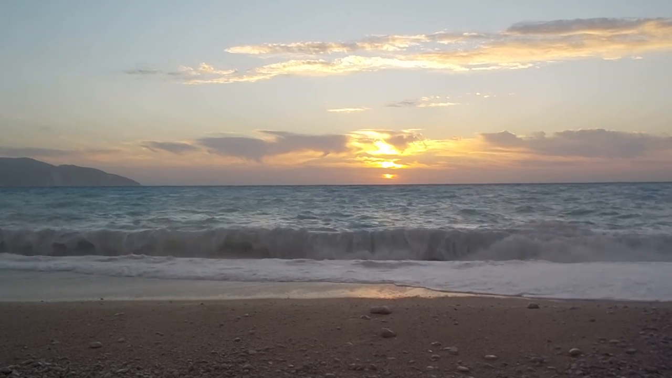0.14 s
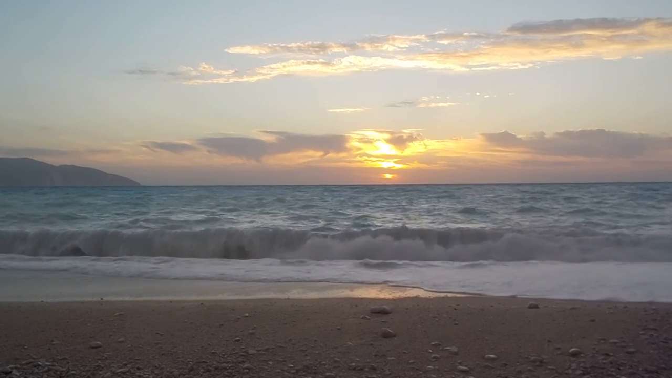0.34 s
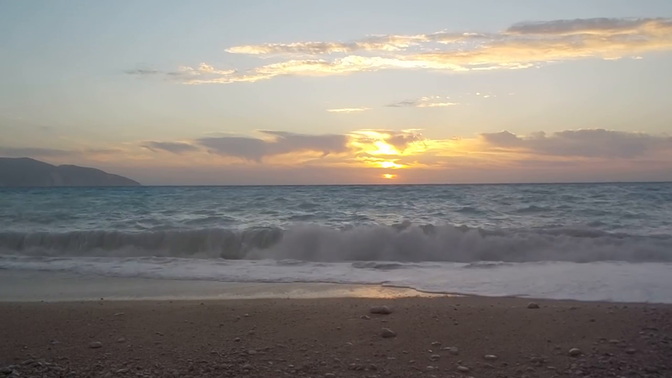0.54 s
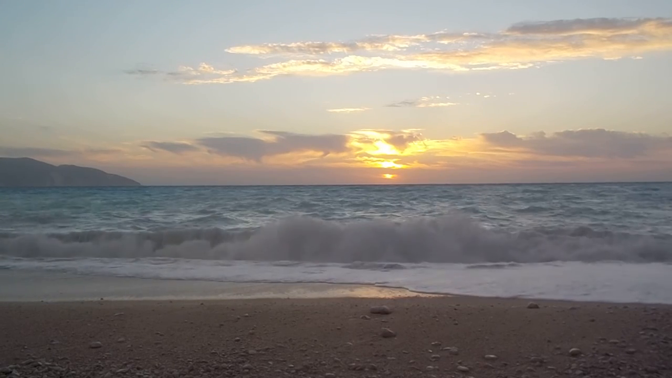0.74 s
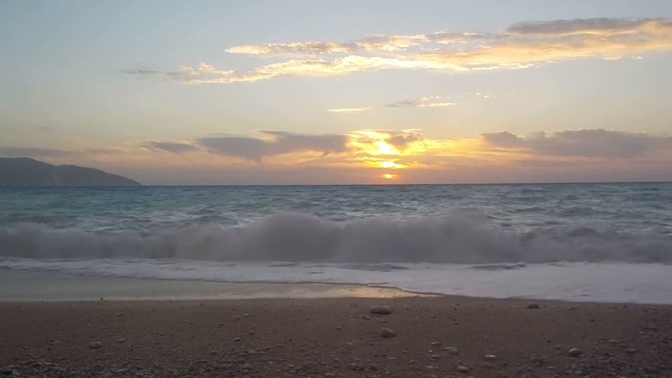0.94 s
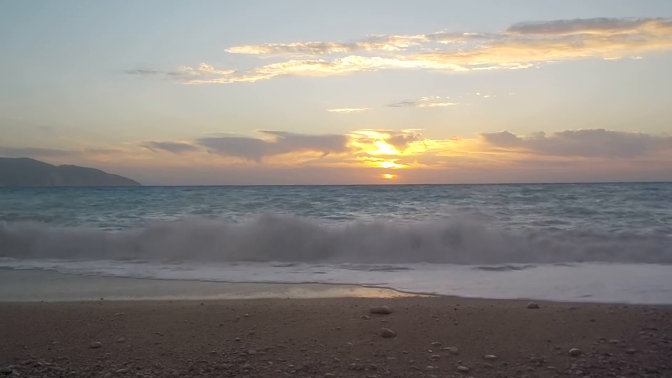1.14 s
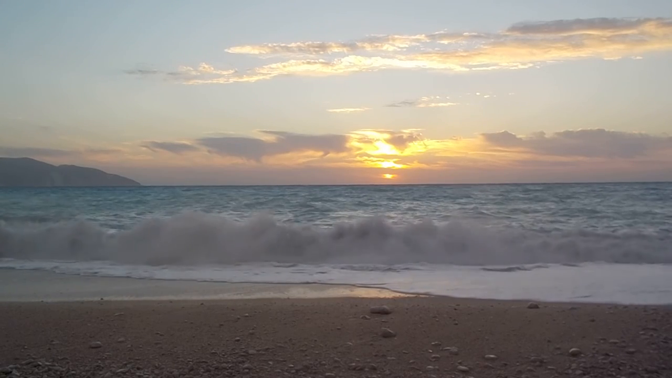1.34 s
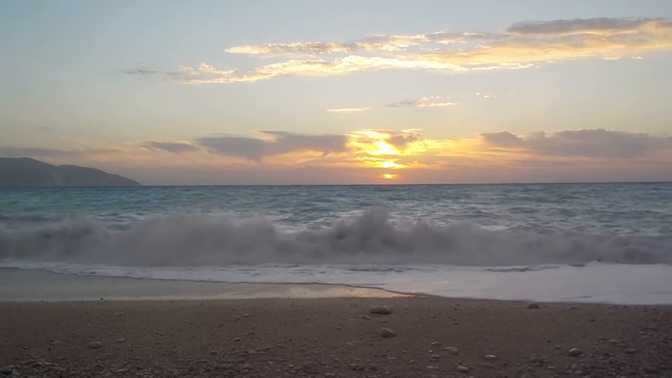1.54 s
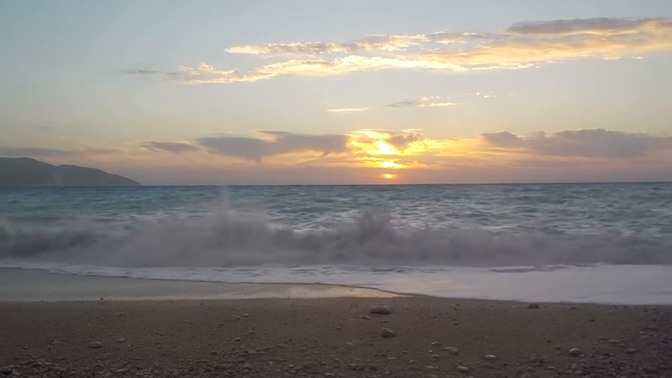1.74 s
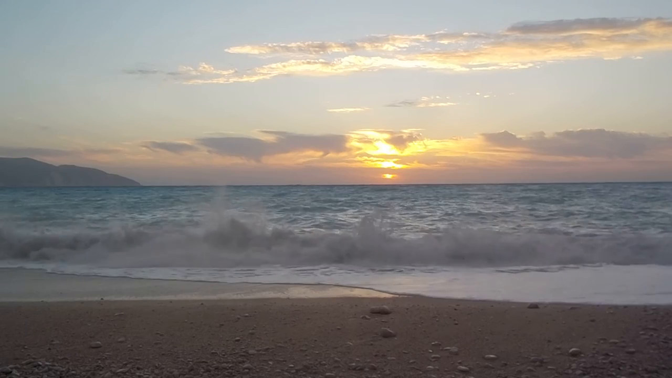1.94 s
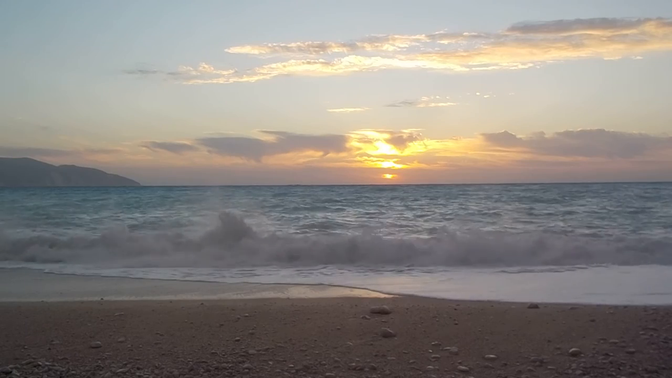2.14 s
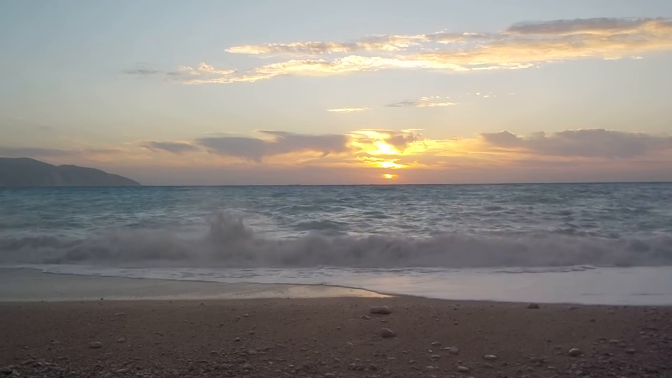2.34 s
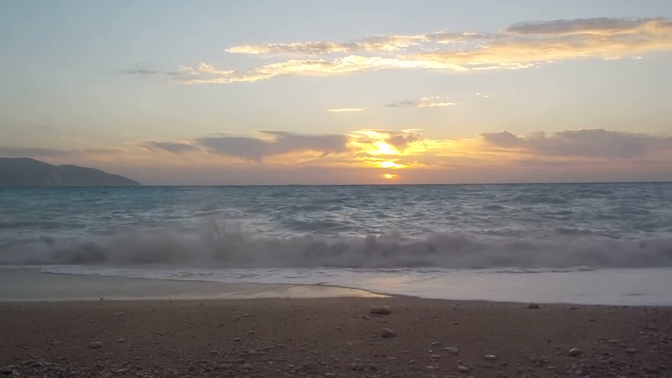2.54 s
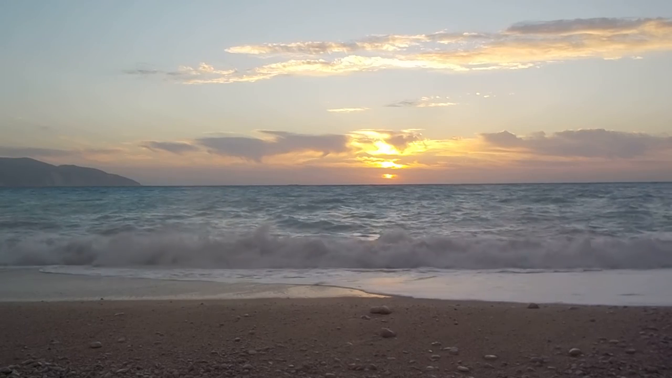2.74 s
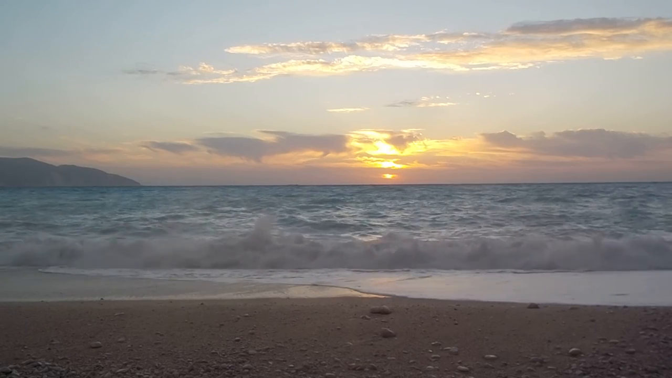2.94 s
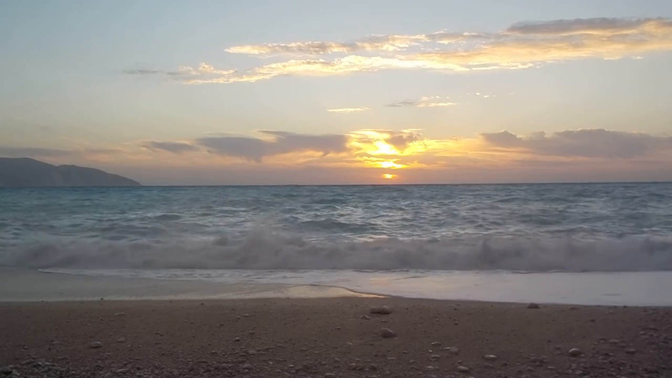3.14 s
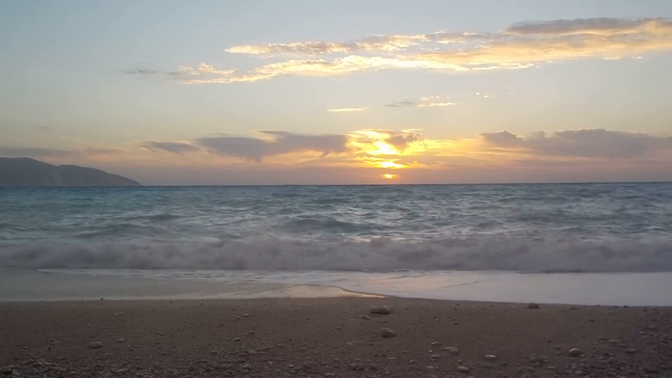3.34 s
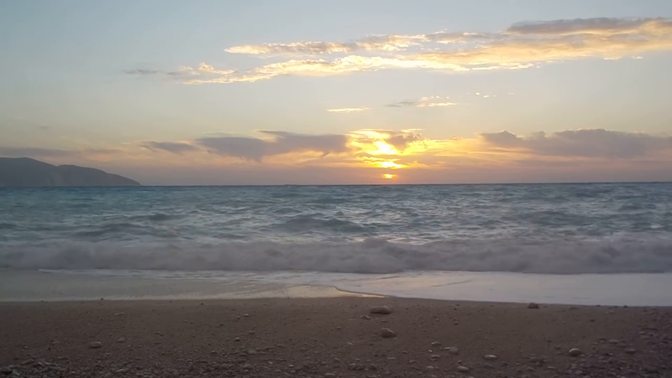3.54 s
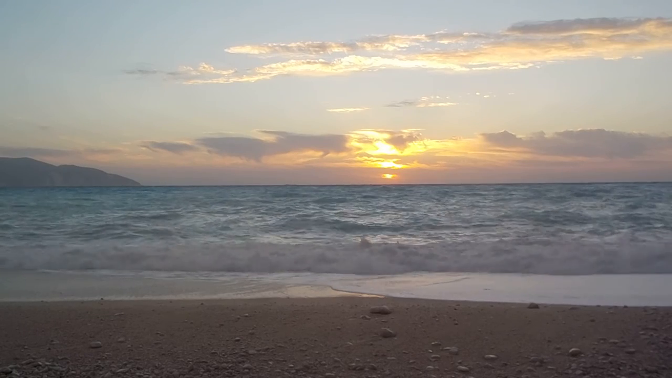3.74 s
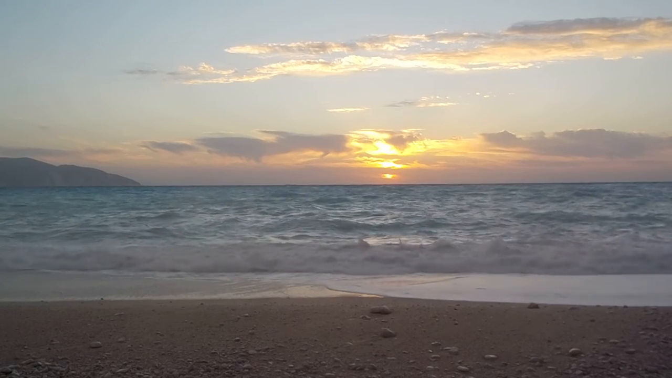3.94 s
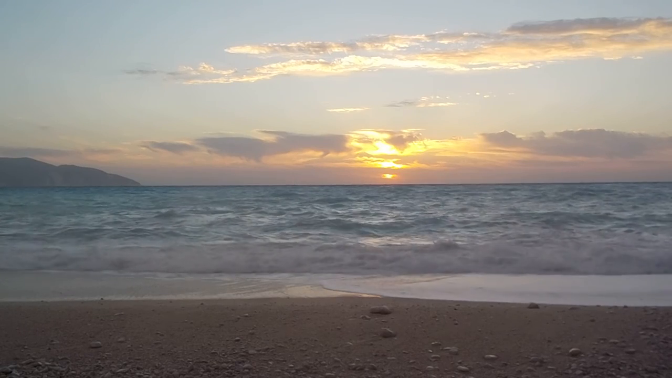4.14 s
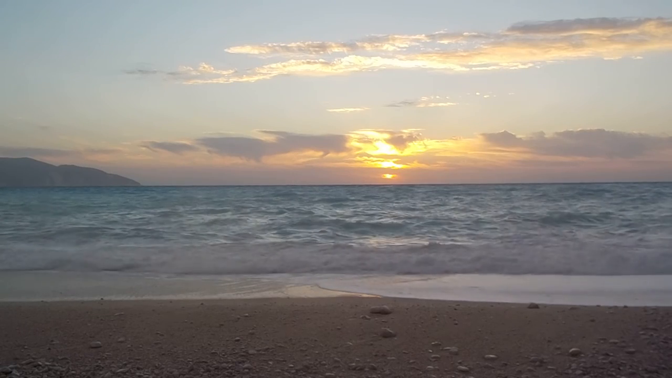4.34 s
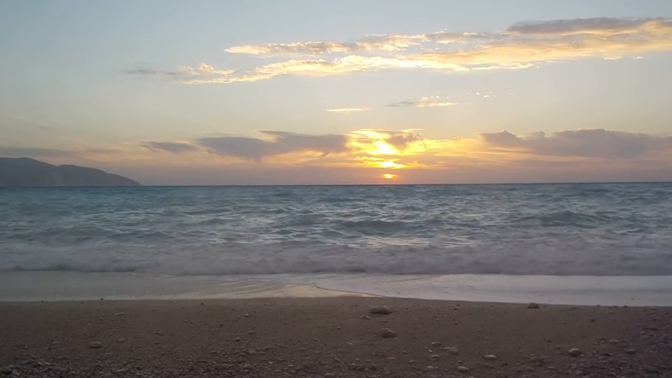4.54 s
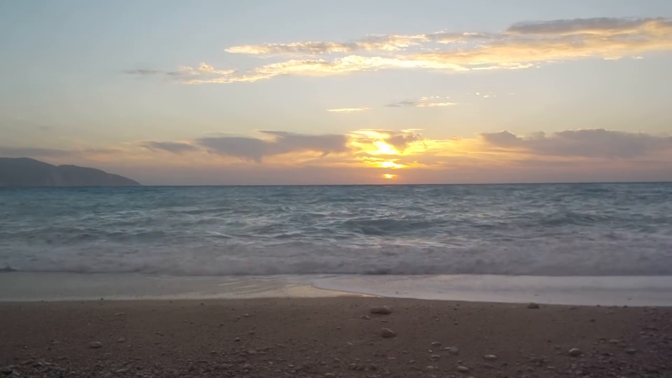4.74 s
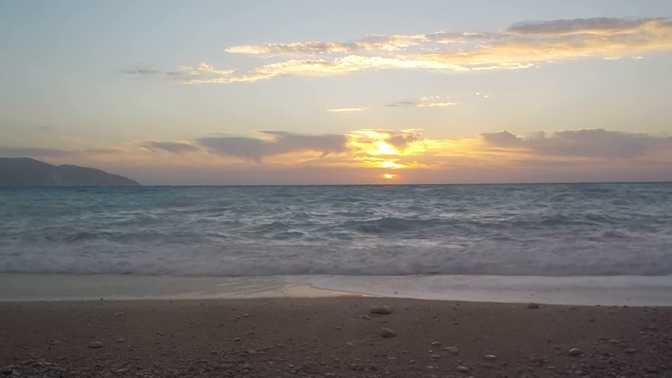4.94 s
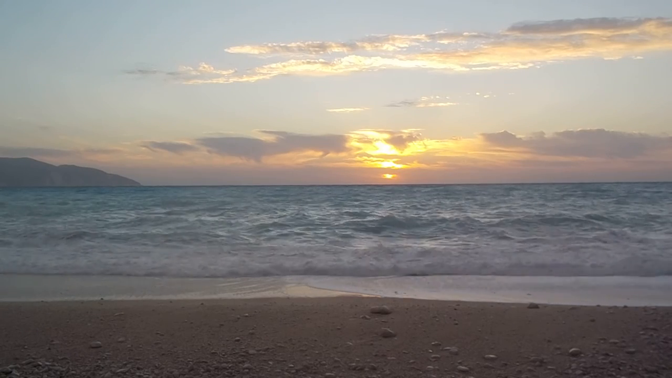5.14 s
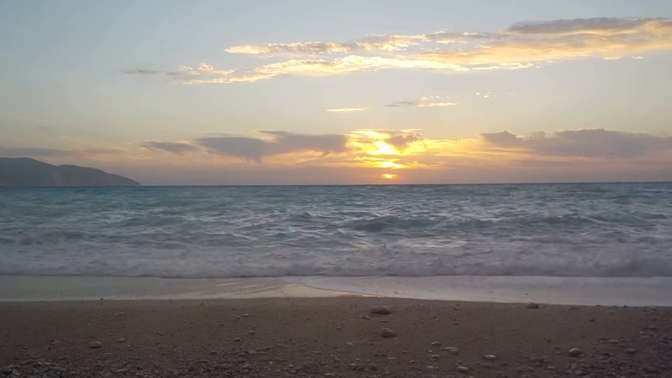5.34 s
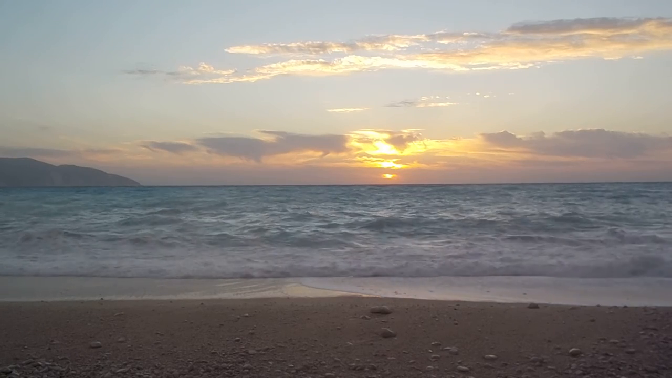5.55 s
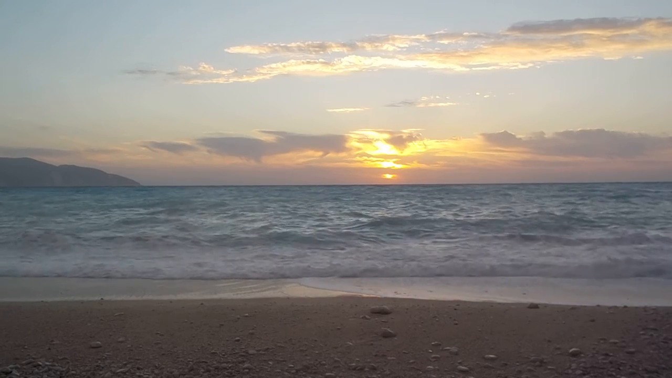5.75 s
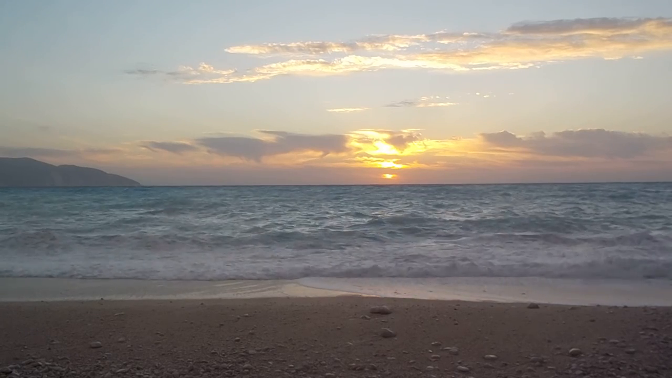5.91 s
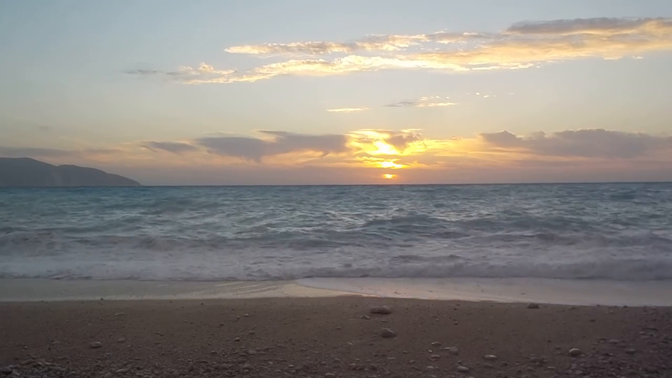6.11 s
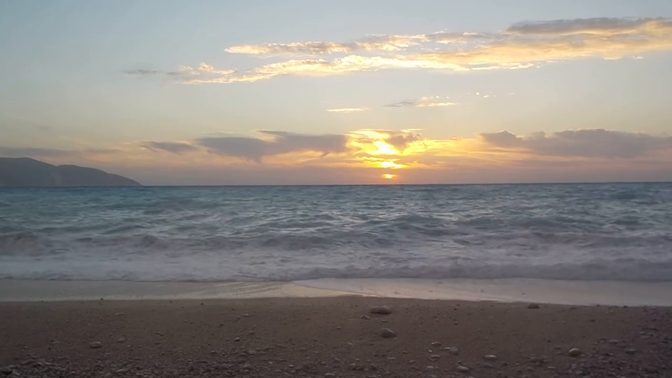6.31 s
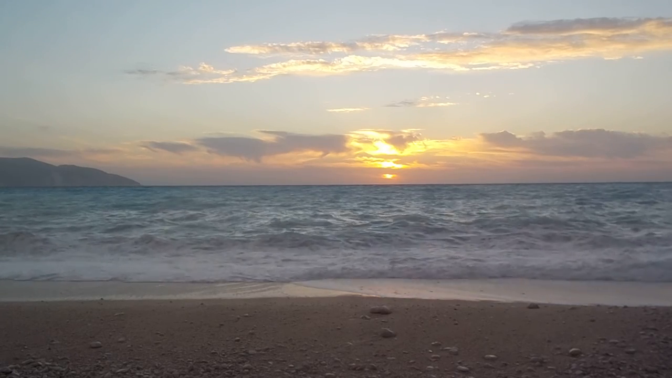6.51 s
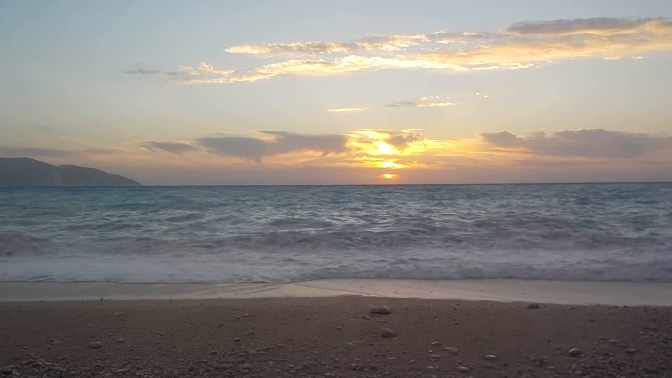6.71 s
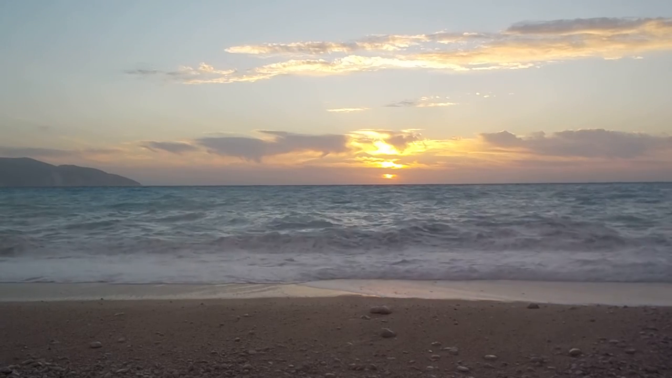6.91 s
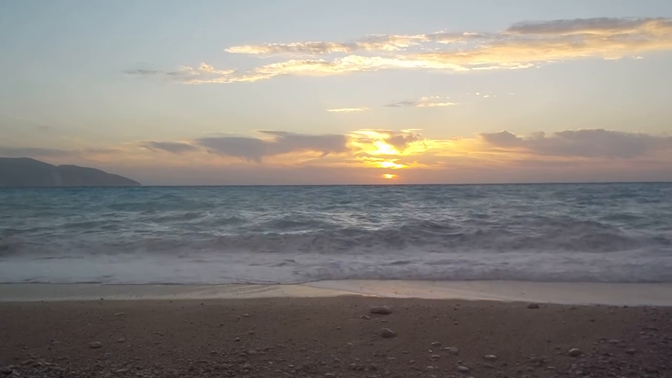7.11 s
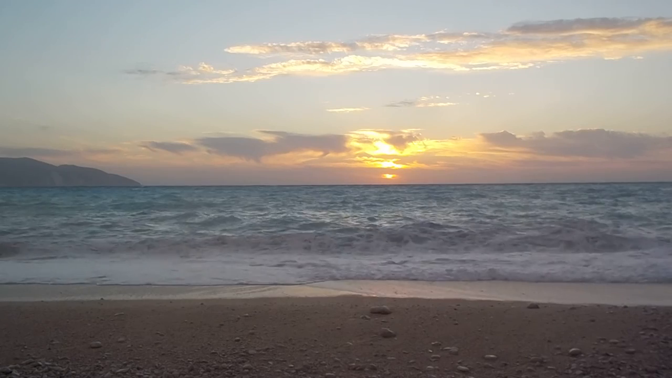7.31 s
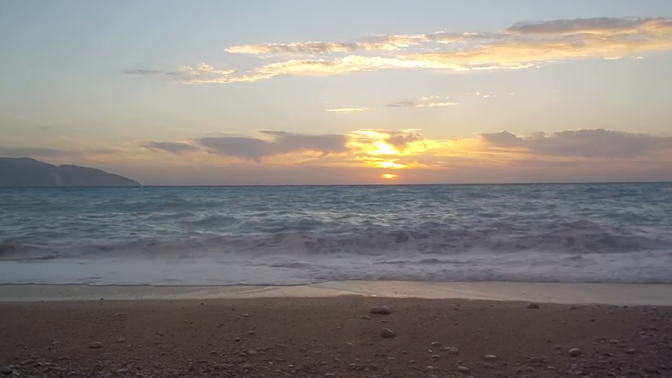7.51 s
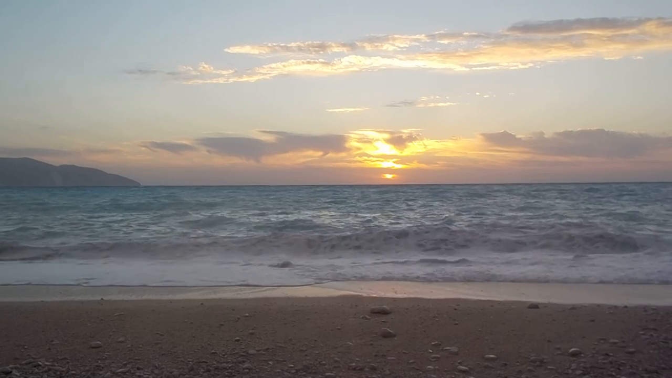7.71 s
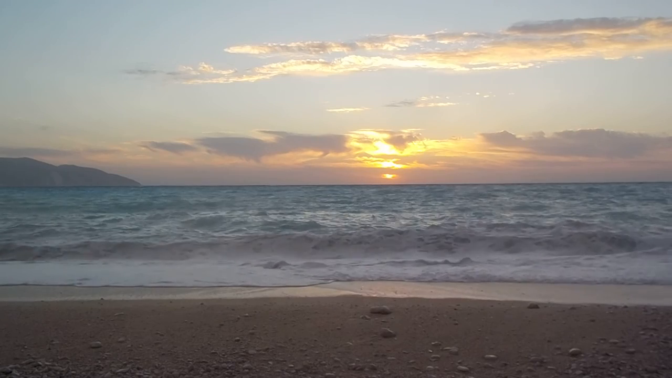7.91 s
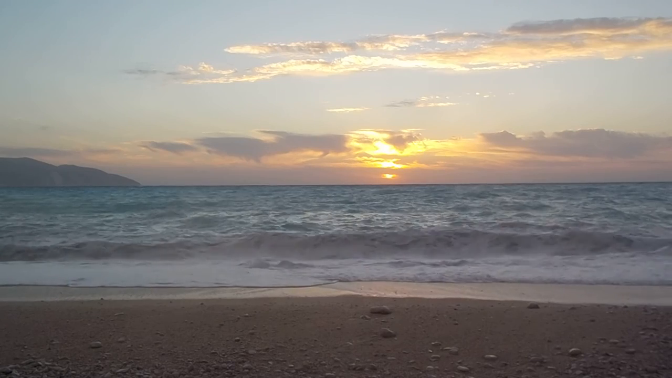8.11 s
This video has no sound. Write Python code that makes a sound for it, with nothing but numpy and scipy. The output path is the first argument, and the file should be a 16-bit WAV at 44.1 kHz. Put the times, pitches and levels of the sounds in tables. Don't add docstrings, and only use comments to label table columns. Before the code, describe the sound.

Close, lumpy wind buffeting batters a small stereo microphone for the first second and a half, nearly covering a wave running in. The wave breaks around two seconds with a broad roar, then sinks into watery hiss over pebbles. Softer gusts flutter between about three and a half and five seconds. Then the wind drops, leaving quiet wash and faint electronic hiss on an open beach.

```python
import sys
import numpy as np
from scipy import signal
from scipy.fft import rfft, irfft
from scipy.io import wavfile

SR = 44100
rng = np.random.default_rng(int(sys.argv[2]) if len(sys.argv) > 2 else 0)


def unload_wav(signal):
    wavfile.write(
        sys.argv[1],
        SR,
        np.round(np.clip(np.atleast_2d(signal).T, -1, 1) * 32767).astype(np.int16),
    )


def boost_factor(decibels):
    exponent = np.asarray(decibels, float) / 20
    return 10 ** exponent


N = 364707


def rms_one(x):
    return x / np.sqrt(np.mean(x ** 2) + 1e-20)


def in_time(rows):
    s, *columns = np.transpose(rows)
    return [np.interp(np.arange(N) / SR, s, column) for column in columns]


def at_hz(points, hz):
    points = np.array(points)
    return np.interp(np.log(hz), np.log(points[:, 0]), points[:, 1])


def drift(rate_hz):
    step, run_in = 20, 4000
    pole = np.exp(-2 * np.pi * rate_hz * step / SR)
    noise = rng.standard_normal(N // step + run_in + 2)
    slow = signal.lfilter([1], [1, -2 * pole, pole * pole], noise)[run_in:]
    return np.interp(np.arange(N) / step, np.arange(len(slow)), rms_one(slow))


def filtered(x, order, hz, kind):
    return signal.sosfilt(signal.butter(order, hz, kind, fs=SR, output="sos"), x)


# frequency in Hz, gain in dB.
LEFT_PORT = [(60, -36.5), (130, -22), (250, -9.5), (450, -3), (1110, -1.5), (1320, -10.5), (1550, -9),
             (2050, -4), (3150, 0), (3700, -5.5), (4600, -12), (5600, -15), (6600, -18), (9500, -29)]
# frequency in Hz, gain in dB against the left port.
RIGHT_PORT = [(300, 2.3), (600, 2.8), (820, 5.7), (1080, -8.5), (1250, -0.0), (1450, -1.4), (1900, 1.6),
              (2250, -11.8), (2400, -11.8), (3200, -12.9), (3900, -5.7), (4300, -6.1), (5000, -2.2),
              (6000, -6.6)]


def ports(x):
    size = 8192
    hz = np.maximum(np.arange(size // 2 + 1) * SR / size, 1)
    left = at_hz(LEFT_PORT, hz)
    left -= 30 * np.log2(np.maximum(hz / LEFT_PORT[-1][0], 1))
    left -= 8.7 * np.log2(np.maximum(LEFT_PORT[0][0] / np.maximum(hz, 15), 1))
    right = left + at_hz(RIGHT_PORT, hz)
    cepstrum = irfft(np.log(boost_factor(np.array([left, right]))))
    cepstrum[:, 1:size // 2] *= 2
    cepstrum[:, size // 2 + 1:] = 0
    impulse = irfft(np.exp(rfft(cepstrum)))
    return signal.fftconvolve(x, impulse, axes=1)[:, :N]


# frequency in Hz, level in dB rms.
WHINE = [(15569, -90), (15628, -88), (15687, -88)]


def electronics():
    hiss_db = -63
    common, left, right = rng.standard_normal((3, N))
    hiss = boost_factor(hiss_db) * (0.47 * common + np.array([left, boost_factor(0.5) * right]))
    out = filtered(hiss, 1, 40, "high")
    for hz, level_db in WHINE:
        out = out + np.sqrt(2) * boost_factor(level_db) * np.sin(2 * np.pi * hz * np.arange(N) / SR)
    return out


# time in seconds, level in dB.
SWELL = [(0.0, -45), (1.5, -44), (3.6, -45.5), (4.6, -52.5), (5.0, -51.5), (5.9, -56.5), (6.4, -49),
         (7.2, -51), (8.27, -49.5)]
# time in seconds, breaker roar in dB, foam fizz in dB.
SURF = [(0.0, -39.5, -39.5), (0.5, -36.5, -37), (1.05, -37, -38), (1.45, -34.5, -34), (1.91, -30.5, -37),
        (2.3, -32, -39.5), (2.95, -32, -41), (3.64, -33, -45), (4.24, -35, -47), (4.63, -37, -49.5),
        (4.9, -37.5, -47.5), (5.96, -39, -48.5), (6.52, -41, -44.5), (6.79, -42, -47.5), (7.16, -43, -48),
        (7.51, -44, -45), (7.85, -43, -41.5), (8.27, -42, -44.5)]
# time in seconds, level in dB.
BACKWASH = [(0.0, -44.5), (1.5, -43), (3.3, -43.5), (3.64, -42), (4.9, -43.5), (5.96, -50), (6.52, -47),
            (7.16, -50.5), (8.27, -49.5)]
SURF_HZ = [280, 800, 1900, 4000, 9500]
SURF_LIFT_DB = [23.8, 19.3, 26.1, 22]
# frequency in Hz, level in dB against the front.
DIFFUSE = [(300, -40), (1500, -7), (4000, -8.5), (6000, -14), (10000, -3.5)]


def surf():
    fizz_share = 0.63
    breaker, foam = in_time(SURF)
    layers = np.array([in_time(SWELL)[0], breaker, in_time(BACKWASH)[0], foam])
    body, roar, wash, fizz = layers + np.array(SURF_LIFT_DB)[:, None]
    spray = fizz_share * fizz + (1 - fizz_share) * roar
    strength = np.array([body, roar, wash, fizz, spray])
    surge = drift(2)
    edges = 40 * 2 ** np.arange(0, 9, .5)
    white = rng.standard_normal((2, 2, N))
    out = 0
    for k, (low, high) in enumerate(zip(edges, edges[1:])):
        hz = np.sqrt(low * high)
        share = [np.interp(np.log(hz), np.log(SURF_HZ), row) for row in np.eye(5)]
        front, around = filtered(white[k % 2], 2, [low, high], "band")
        gain = boost_factor(share @ strength + 0.04 * surge + 0.65 * drift(7.1))
        sides = boost_factor(at_hz(DIFFUSE, hz)) * around * [[1], [-1]]
        out = out + gain * (front + sides)
    return ports(out)


# start in seconds, length in seconds, from Hz, to Hz, level in dB.
WHISTLES = [
    (0.445, 0.016, 1270, 1380, -27),
    (0.537, 0.042, 1310, 1250, -27.5),
]


def whistles():
    out = np.zeros(N)
    for s, length, from_hz, to_hz, level_db in WHISTLES:
        glide = np.linspace(from_hz, to_hz, round(length * SR))
        count = len(glide)
        flutter = boost_factor(rng.normal(0, 2.2, 5).repeat(count // 5 + 1)[:count])
        tone = np.sin(2 * np.pi * np.cumsum(glide) / SR)
        i = round(s * SR)
        out[i:i + count] += boost_factor(level_db) * np.hanning(count) ** .5 * flutter * tone
    return out


# time in seconds, level in dB, left minus right in dB.
BREEZE = [(0.0, -42, -1), (1.4, -44.5, -1), (2.0, -49, 0), (2.8, -48.5, -4), (3.45, -49, -4),
          (3.5, -36, -2), (3.56, -48, -6), (3.7, -44, -2), (3.75, -32.5, -2), (4.2, -34, 9.5),
          (4.66, -37.5, -1), (4.7, -55, -4), (5.06, -63, -4), (5.085, -42, -7), (5.22, -43, 0),
          (5.4, -56, 4), (6.0, -74, 3), (6.3, -62, 2)]
# start in seconds, length in seconds, usual eddy in dB on the left port, on the right port.
GUSTS = [(0.0, 0.045, -12, -16), (.128, .025, -21, -21), (.165, .028, -14.5, -17), (.26, 0.047, -29, -26.5),
         (.388, 0.025, -13.5, -19.5), (.487, 0.025, -11.5, -11), (.535, 0.039, -22, -33),
         (.59, .035, -11.5, -14.5), (.632, .065, -14.5, -17.5), (0.709, .033, -12, -11.5),
         (0.757, .043, -13, -13), (0.797, .08, -12.5, -13), (.893, .034, -13.5, -12), (.945, .02, -19, -23),
         (1.065, 0.049, -10, -16.5), (1.122, 0.046, -18, -14), (1.28, .046, -13.5, -12.5),
         (1.332, 0.018, -18, -12.5), (1.675, 0.023, -26, -31), (1.935, 0.025, -14, -21),
         (3.06, 0.0615, -32, -28), (3.733, 0.044, -16.5, -22.5), (3.81, 0.051, -22.5, -21.5),
         (4.049, .045, -19.5, -27), (4.305, 0.041, -17, -31), (4.36, 0.056, -16.5, -22.5),
         (4.435, 0.053, -26, -22), (4.598, 0.063, -23, -28.5), (5.112, .02, -25.5, -21.5),
         (5.155, 0.054, -28, -22.5)]


def wind():
    push_db, edge_s = -12.5, 0.0093
    level_db, pan_db = in_time(BREEZE)
    push = boost_factor(level_db + pan_db * np.array([[.5], [-.5]]))
    for s, length, *sides_db in GUSTS:
        i = np.arange(max(round((s - edge_s) * SR), 0), round((s + length + edge_s) * SR))
        inside_s = np.minimum(i / SR - s, s + length - i / SR)
        shape = np.clip(inside_s / edge_s + .5, 0, 1)
        gust = boost_factor(np.array(sides_db)[:, None] + push_db) * shape ** 2
        push[:, i] = np.maximum(push[:, i], gust)
    lumps = [boost_factor(3.2 * drift(58) + 1.5 * drift(6.6)) * rng.standard_normal(N) for side in range(2)]
    dull = filtered(np.array(lumps), 2, 330, "low")
    return rms_one(ports(dull)) * push


def shed(side):
    gap_s, spread_db, usual_hz, spread_octaves = .007, 0.5, 608, 0.43
    octaves_per_db, firm_db = 0.0734, -13.5
    rows = []
    for gust, (gap, size, pitch) in zip(GUSTS, rng.standard_normal((len(GUSTS), 3, 24))):
        start, length, level_db = gust[0], gust[1], gust[2 + side]
        s = np.cumsum(gap_s * 2 ** (.5 * gap)) - gap_s / 2
        octaves = spread_octaves * pitch + octaves_per_db * (level_db - firm_db)
        shed_rows = np.transpose([start + s, level_db + spread_db * size, usual_hz * 2 ** octaves])
        rows += list(shed_rows[s < length])
    return rows


def eddies(rows, port_db, lift_db):
    cycles, lead_s = .43, .0006
    skirt_db, skirt_s = -15, .005
    out, flurry = np.zeros((2, N + 2000))
    t = np.arange(-1000, 1000) / SR
    for (s, peak_db, hz), turn in zip(rows, rng.random((len(rows), 1))):
        i = round((s - lead_s) * SR)
        keep = slice(max(1000 - i, 0), None)
        at = slice(max(i - 1000, 0), i + 1000)
        packet = np.exp(-.5 * (t * hz / cycles) ** 2) * np.cos(2 * np.pi * (hz * t + turn))
        strength = boost_factor(peak_db + lift_db - port_db(1.3 * hz))
        out[at] += (strength * packet)[keep]
        flurry[at] += (boost_factor(2 * peak_db) * np.exp(-(t / skirt_s) ** 2))[keep]
    gritty = boost_factor(2.5 * drift(120)) * rng.standard_normal(N)
    rough = rms_one(filtered(gritty, 2, [150, 1040], "band"))
    return out[:N] + boost_factor(skirt_db) * np.sqrt(flurry[:N]) * rough


def snaps(rows):
    s, peak_db, hz = np.transpose(rows)
    out = np.zeros(N)
    out[(s * SR).astype(int)] = boost_factor(3 * peak_db - 16)
    return out


# time in seconds, peak in dB, frequency in Hz.
EDDIES_LEFT = [(0.0054, -5.5, 980), (0.0232, -8.2, 860), (0.0316, -7.9, 1060), (0.1305, -10.9, 510),
               (0.4101, -2.9, 870), (0.4898, -7.7, 820), (0.5968, -7.5, 820), (0.6223, -8.4, 850),
               (0.6849, -8.1, 570), (0.7275, -9.5, 620), (0.8007, -6.5, 750), (0.811, -4.2, 480),
               (0.8346, -6.3, 740), (0.9076, -5.6, 720), (1.0864, -2.3, 840), (1.1019, -6.8, 730),
               (1.1086, -5.9, 970), (1.1244, -6.2, 520), (1.1435, -6.8, 550), (1.3079, -6.3, 620),
               (1.6767, -8.5, 680), (1.9525, -7.4, 530), (3.1114, -23, 190), (3.7687, -13.0, 580),
               (3.9918, -16.9, 590), (4.6083, -17.9, 400), (4.0868, -12.1, 480), (4.3161, -11.7, 570),
               (4.363, -14.0, 680), (4.3847, -10.8, 620), (5.2007, -14.4, 740)]
# time in seconds, peak in dB, frequency in Hz.
EDDIES_RIGHT = [(0.013, -6.8, 840), (0.1478, -11.4, 600), (0.4956, -6.1, 640), (0.5004, -4.9, 630),
                (0.508, -7.0, 620), (0.6161, -10.6, 640), (0.6516, -5.7, 710), (0.7194, -8.1, 620),
                (0.7305, -5.5, 600), (0.76, -8.0, 560), (0.7836, -8.0, 570), (0.7914, -5.0, 540),
                (0.8152, -6.7, 610), (0.8287, -6.8, 640), (0.8343, -6.3, 460), (0.8565, -4.7, 700),
                (0.8988, -8.5, 580), (0.9163, -3.1, 730), (0.9238, -7.9, 500), (1.1326, -6.1, 770),
                (1.1398, -3.8, 670), (1.2949, -5.5, 260), (1.3044, -2.1, 550), (1.3353, -5.9, 580),
                (3.8159, -12.5, 730), (2.87, -26, 170), (3.075, -25, 170), (4.4778, -17.7, 290),
                (4.8724, -21.0, 760), (5.1233, -16.3, 560)]


def buffeting():
    def left_db(hz):
        return at_hz(LEFT_PORT, hz)

    def right_db(hz):
        return left_db(hz) + at_hz(RIGHT_PORT, hz)

    left = eddies(EDDIES_LEFT + shed(0), left_db, lift_db=1.5)
    right = eddies(EDDIES_RIGHT + shed(1), right_db, lift_db=0.5)
    pressure = wind() + ports(np.array([left, right]))
    clicks = np.array([snaps(EDDIES_LEFT), snaps(EDDIES_RIGHT)])
    return filtered(pressure, 2, 110, "high") + clicks


def scene():
    edge_tones = np.array([np.zeros(N), whistles()])
    return electronics() + surf() + edge_tones + buffeting()


# frequency in Hz, width in Hz.
NOTCHES = [(1738, 130), (1780, 110), (2541, 1700), (2548, 240), (4969, 200), (7370, 3800), (8170, 3800)]


def motor_notches(x):
    notches = [np.concatenate(signal.iirnotch(hz, hz / width, SR)) for hz, width in NOTCHES]
    return signal.sosfilt(notches, x)


def roll_off(x):
    return signal.sosfilt(signal.butter(12, 15770, fs=SR, output="sos"), x)


def record(dry):
    rounded = 1.2 * np.tanh(dry / 1.2)
    return roll_off(motor_notches(rounded))


dry = scene()
out = record(dry)
unload_wav(out)
```